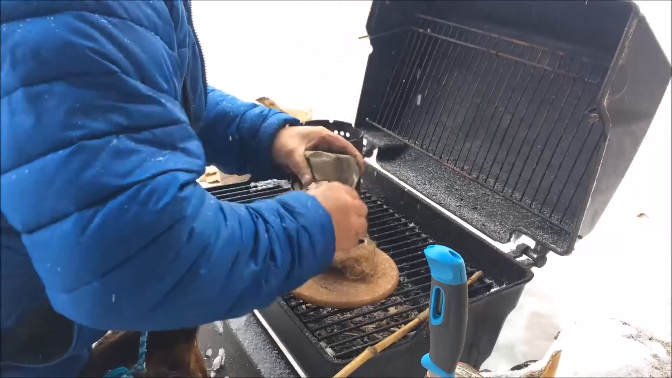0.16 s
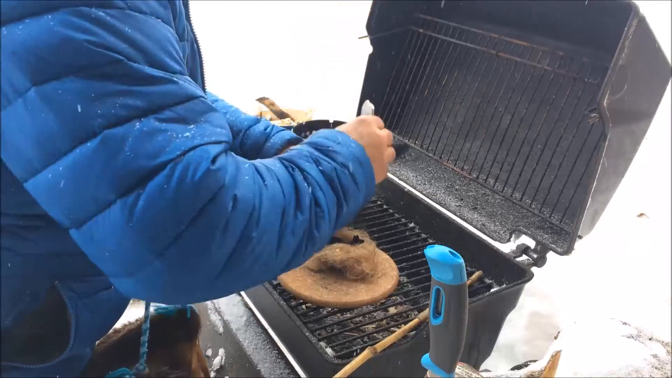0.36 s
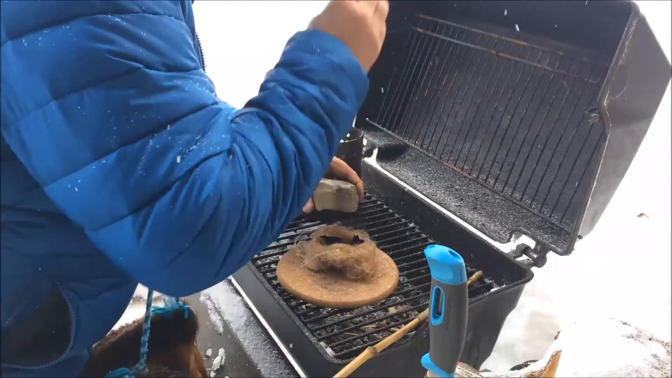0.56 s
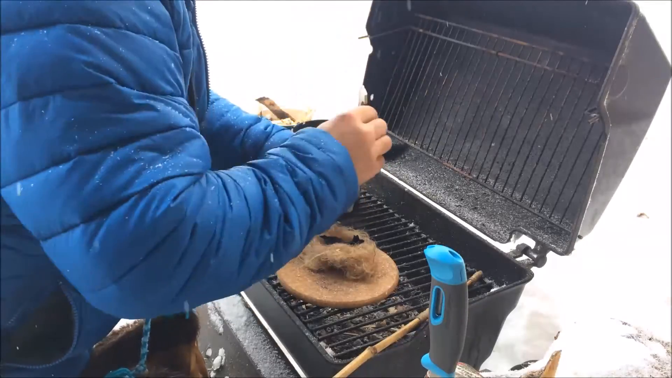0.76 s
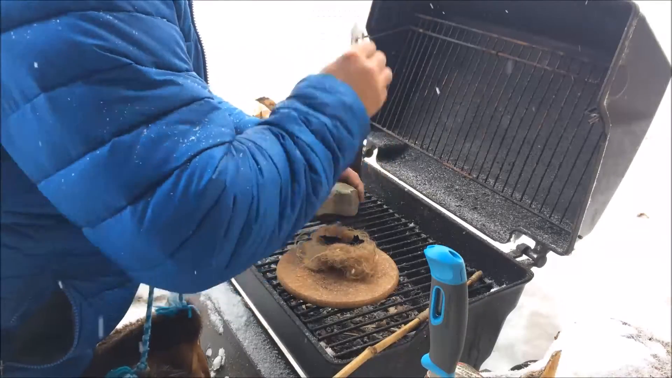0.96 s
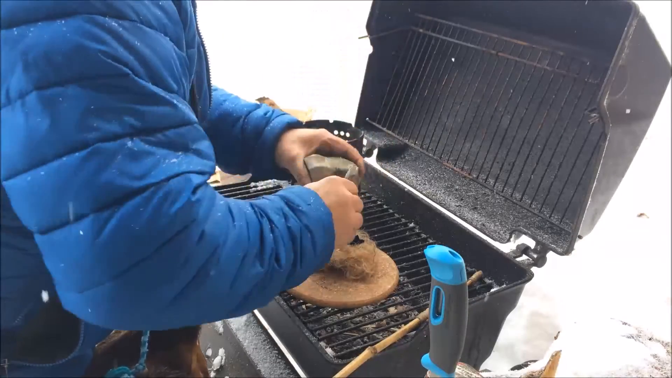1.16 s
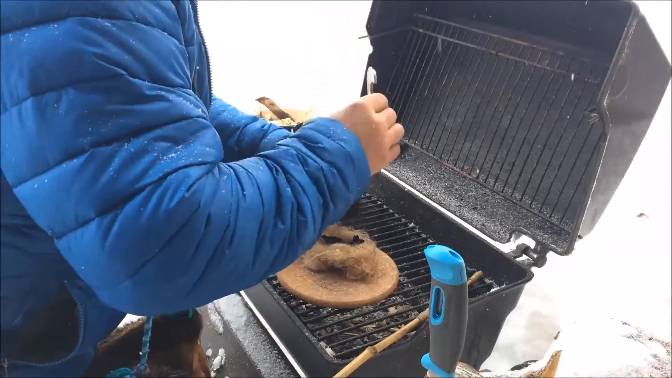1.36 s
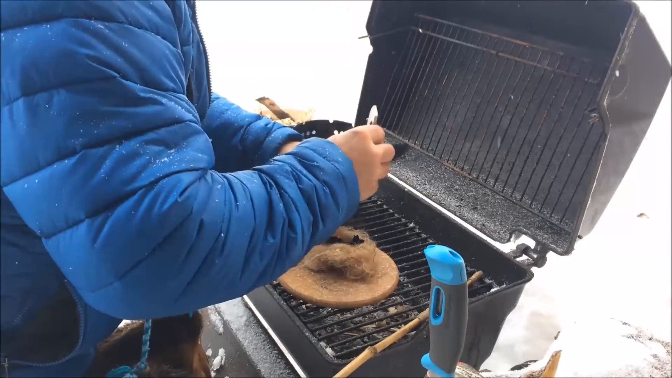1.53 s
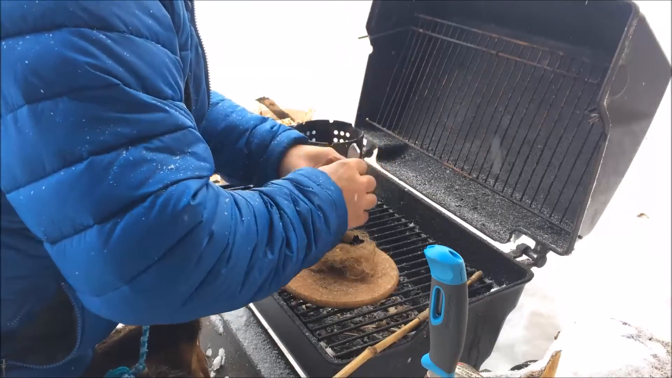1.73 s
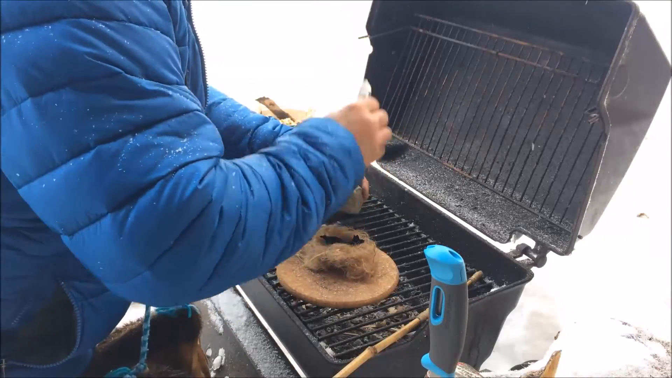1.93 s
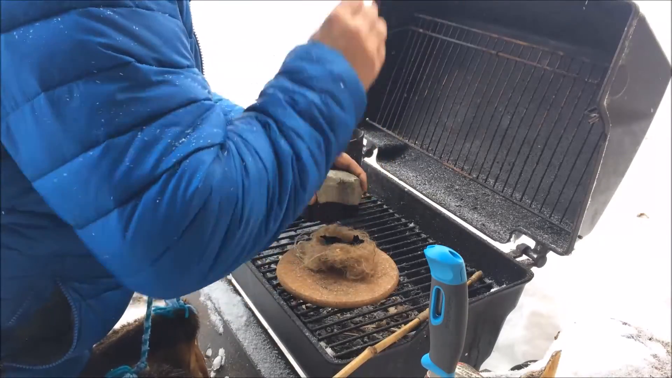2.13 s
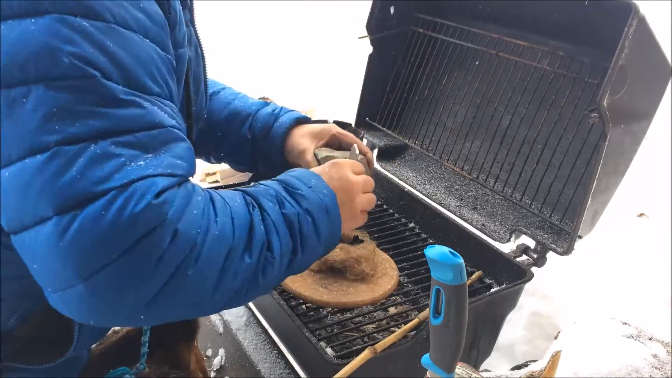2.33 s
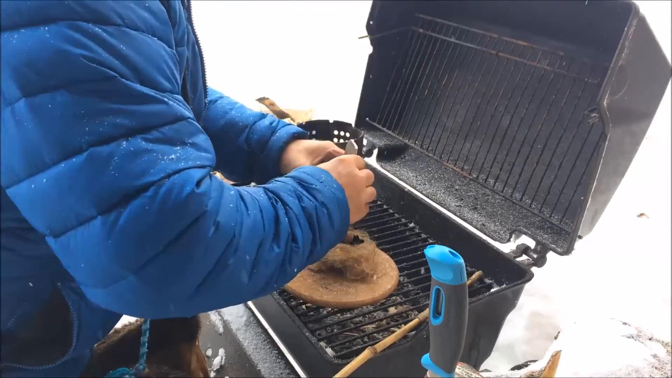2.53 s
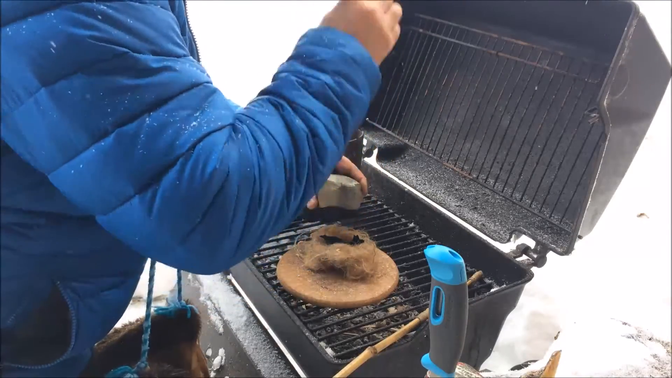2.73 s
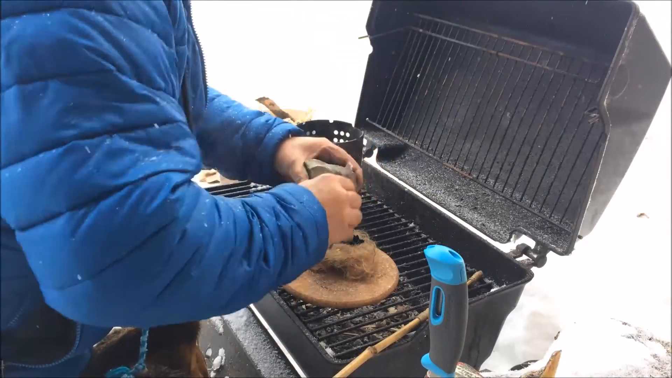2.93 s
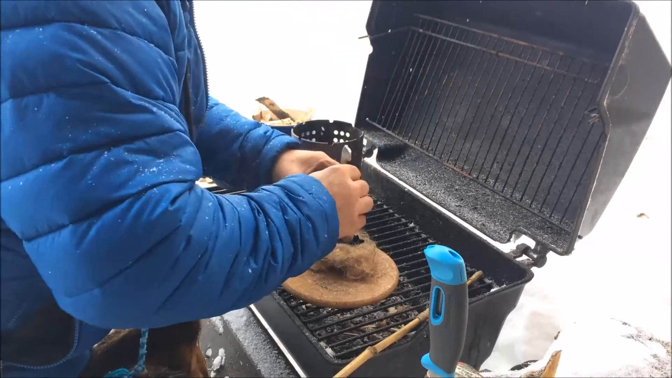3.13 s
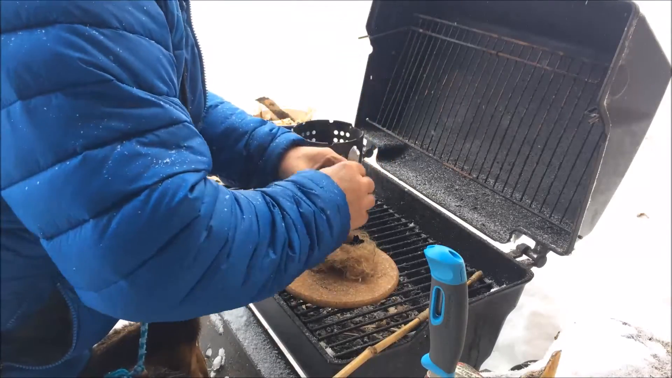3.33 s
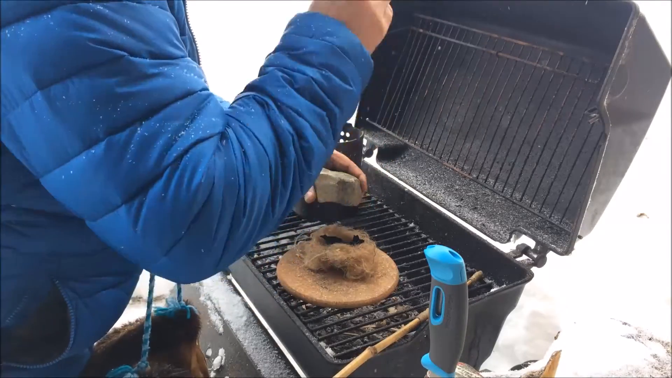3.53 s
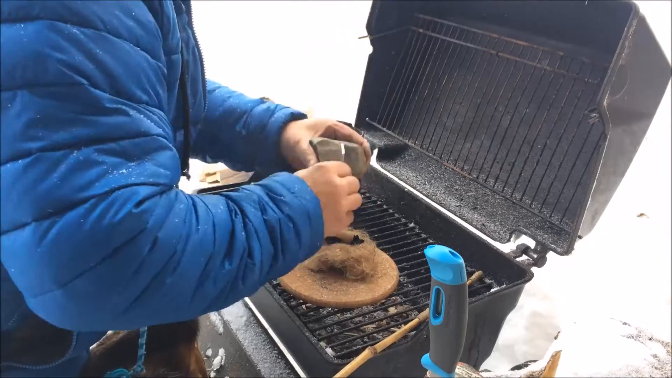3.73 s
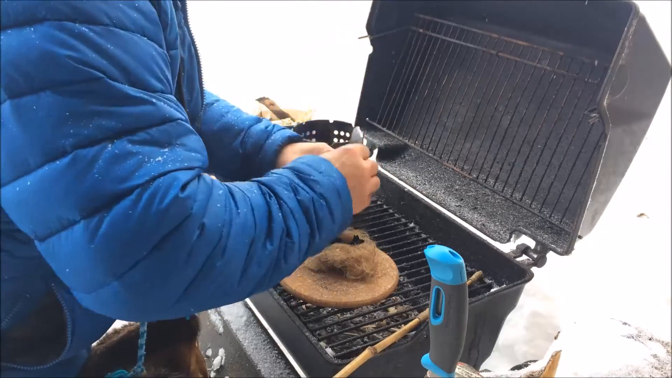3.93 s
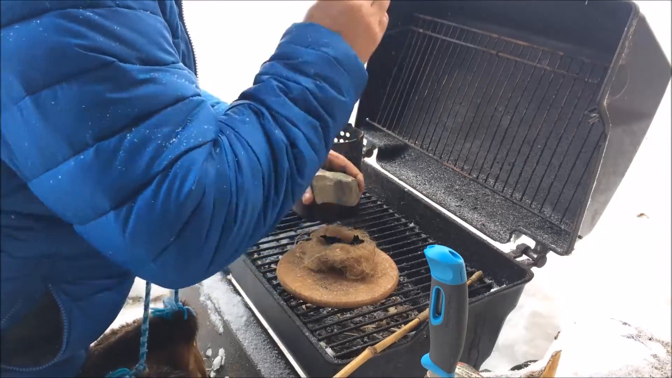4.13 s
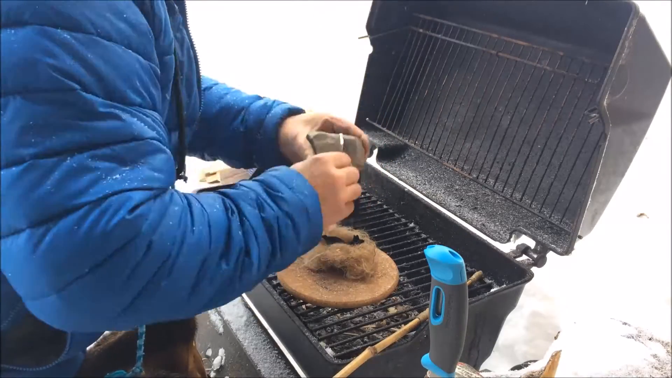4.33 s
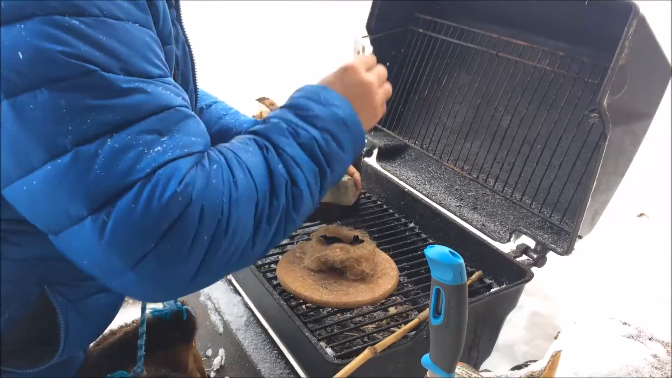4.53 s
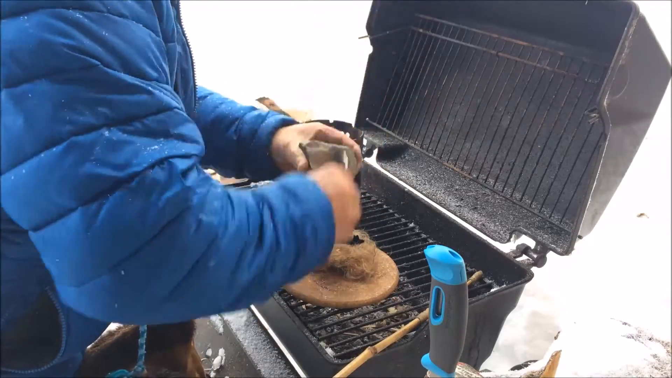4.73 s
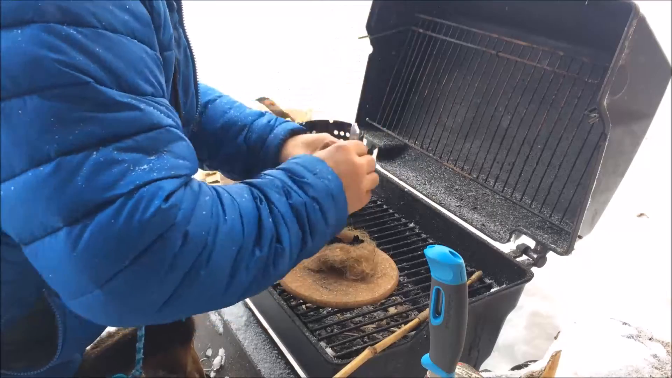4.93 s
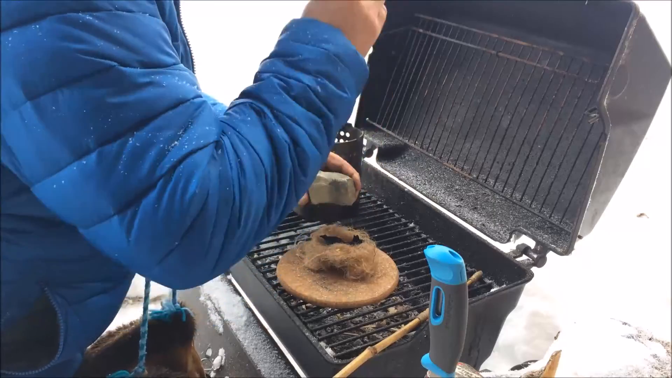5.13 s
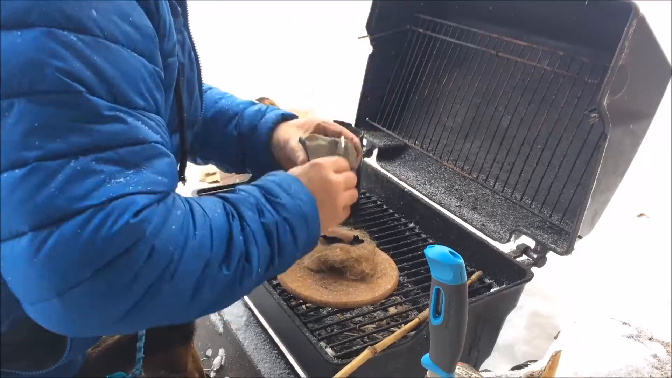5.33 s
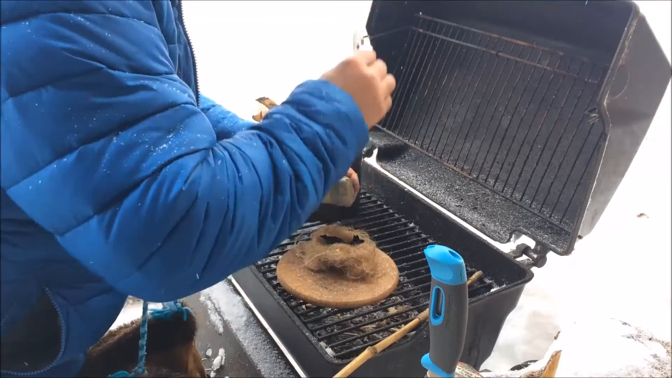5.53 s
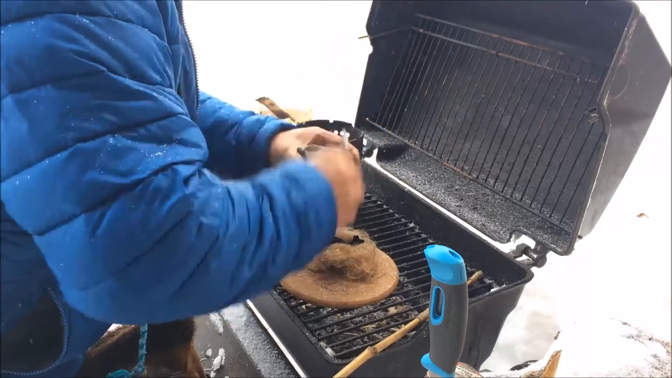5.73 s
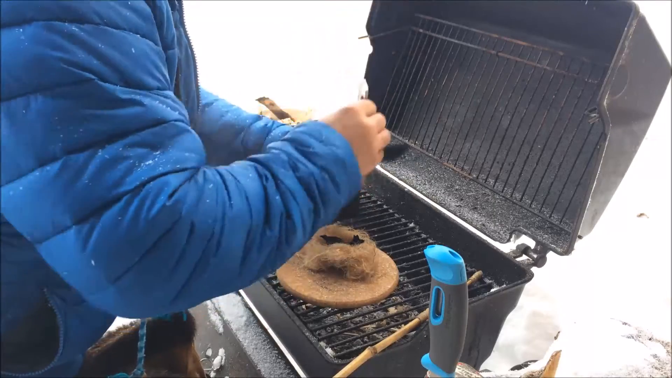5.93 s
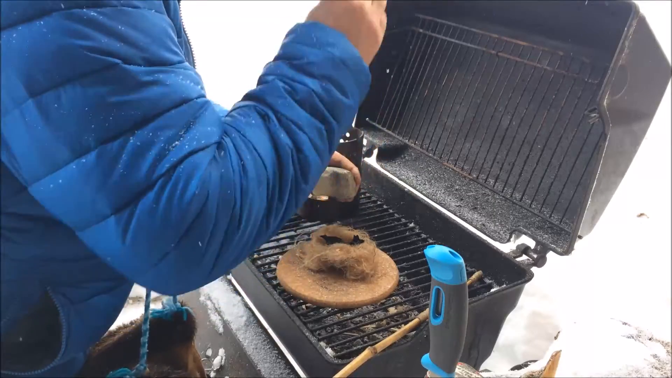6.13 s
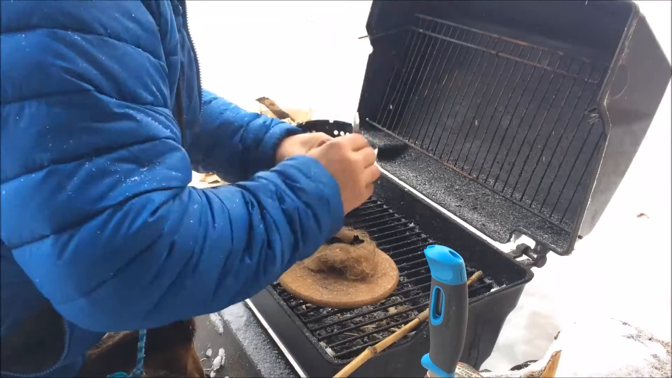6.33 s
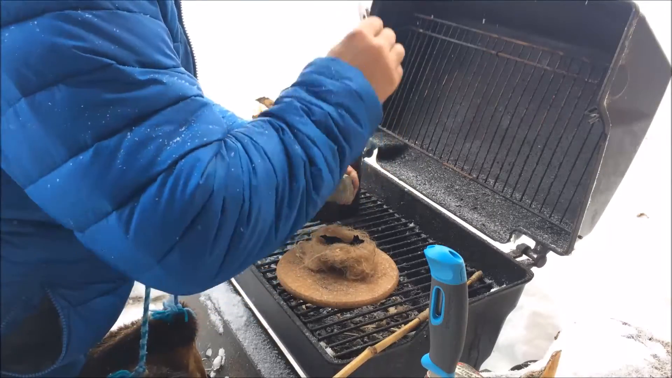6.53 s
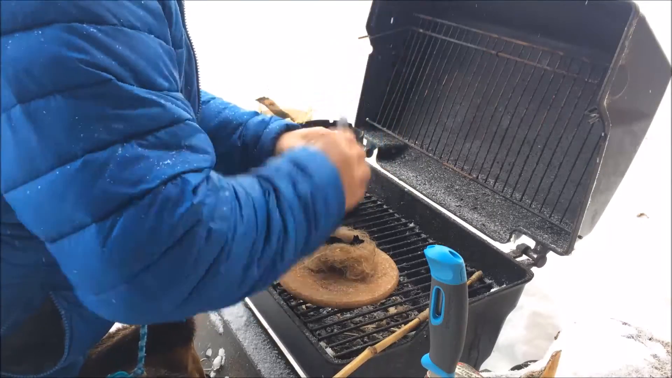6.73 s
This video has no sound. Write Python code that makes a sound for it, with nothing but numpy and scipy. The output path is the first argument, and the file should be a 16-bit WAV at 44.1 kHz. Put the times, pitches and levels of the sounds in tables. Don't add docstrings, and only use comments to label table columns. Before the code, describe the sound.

Repeated hard, bright strikes of steel on stone ring briefly above a metal grill, with padded cloth rustling between them and a low engine murmur far behind.

```python
import sys
import numpy as np
from scipy import signal
from scipy.fft import rfft, irfft
from scipy.io import wavfile
from scipy.ndimage import uniform_filter1d, map_coordinates

SR = 44100
rng = np.random.default_rng(int(sys.argv[2]) if len(sys.argv) > 2 else 0)


def ratio_of_db(decibels):
    return 10 ** (np.asarray(decibels, float) / 20)


def bounce(signal):
    frames = np.transpose(np.atleast_2d(signal))
    limited = np.clip(frames, -1, 1)
    pcm = np.round(limited * 32767).astype(np.int16)
    wavfile.write(sys.argv[1], SR, pcm)


N = 302967

# (time [s], stone knock [dB], bar low mode [dB], bar middle mode [dB], bar high mode [dB])
BLOWS = [(0.2376, -21, -7, -19.5, -9), (0.7483, -12, -10.5, -20, -12), (1.2545, -11, -13, -20.5, -20),
         (1.274, -30.5, -36, -34, -17.5), (1.2895, -27, -22.5, -44, -29.5),
         (2.3015, -10, -11.5, -14.5, -10), (3.004, -13.5, -12.5, -15, -8), (3.747, -15.5, -9, -14, -24.5),
         (4.348, -11, -8, -21.5, -15.5), (4.8528, -10.5, -6.5, -18.5, -19),
         (4.8716, -38, -24.5, -36, -28.5), (5.358, -14.5, -10.5, -31.5, -6.5),
         (5.858, -12.5, -7.5, -19.5, -18), (6.322, -12.5, -12.5, -17, -10.5),
         (6.8613, -16, -8.5, -21, -10.5)]
# (frequency [Hz], width [Hz], level [dB])
STONE = [(832, 59, -9.5), (1312, 600, -2.5), (1406, 36, -6), (1420, 270, -3.5), (1753, 130, -0.5),
         (1994, 210, -5.5), (2040, 45, -3.5), (2260, 250, 0.5), (2471, 50, -2.5), (1970, 2100, -5)]
# (frequency [Hz], width [Hz], level [dB])
BAR_MIDDLE = [(7190, 140, 0), (7050, 60, -4)]
BAR_HIGH = [(10680, 150, 0), (11350, 130, -4), (11000, 1500, -14)]
# (frequency [Hz], width [Hz], level [dB])
GRIT = [(3060, 9100, -4), (5580, 9500, 0.5), (9070, 3100, -8.5), (12010, 530, -12.5), (14200, 250, -7)]
# (frequency [Hz], width [Hz], level [dB])
CRACK = [(1700, 1200, 0), (3300, 2500, -6), (8000, 5000, -22)]
# (frequency [Hz], width [Hz], level [dB])
GRILL_RODS = [(4270, 12, 0), (4385, 15, 0), (4190, 18, -6), (4560, 16, -5)]
# (frequency [Hz], width [Hz], level [dB])
HAND_THUD = [(260, 110, 1.5), (324, 8.4, -1.5), (570, 110, -2)]
# (frequency [Hz], t60 [s])
HOOD_DECAY = [(400, 0.19), (1500, 0.14), (4500, 0.12), (9000, 0.14), (12500, 0.13), (15000, 0.16)]
# (time [s], stone knock [dB], bar low mode [dB], bar middle mode [dB], bar edge mode [dB])
TOUCHES = [
    (1.8376, -17.5, -33, -34, -24.5),
    (1.9268, -31.5, -35, -34, -41),
    (2.6655, -28.5, -30, -17, -27),
    (3.3823, -8.5, -7.5, -21, -36),
]
# (frequency [Hz], width [Hz], level [dB])
TOUCHED_PARTS = [
    [(1500, 600, 0), (2000, 700, 0), (2650, 700, -8), (3500, 900, -17)],
    [(4370, 160, 0), (4300, 40, -7)],
    [(7190, 45, 0)],
    [(11400, 60, 0), (10700, 80, -6), (14700, 200, -8)],
]
# (time [s], frequency [Hz], level [dB], t60 [s])
THUMPS = [
    (1.645, 160, -39, 0.084),
    (1.671, 162, -40, 0.09),
    (3.012, 83.3, -41, 0.2),
    (4.699, 300, -44, 0.015),
]
# (time [s], level [dB])
NUDGES = [
    (1.623, -52.5),
    (1.645, -59),
    (1.665, -58),
    (1.685, -65),
]
# (frequency [Hz], level [dB], t60 [s])
RATTLE = [(2330, -2, 0.045), (2840, -3.5, 0.061), (4750, 5, 0.029), (5740, 0, .06), (5840, -1, 0.048),
          (6200, -2, 0.087), (6900, -7, 0.095), (7320, -8, 0.11), (10500, -9, 0.17)]
# (time of full speed [s], cloth level [dB], held [s])
ARM_LIFTS = [(0.04, -66.5, .1), (.57, -66.5, .07), (1.07, -69, .1), (1.71, -75, .05), (2.12, -66, .08),
             (2.78, -66.5, .1), (3.54, -66.5, .1), (4.18, -66.5, .05), (4.66, -68, .06), (5.18, -66, .05),
             (5.69, -65.5, .06), (6.0, -71, .06), (6.18, -67, .06), (6.6, -70, .12)]
# (frequency [Hz], density [dB per Hz])
CLOTH_HISS = [(2000, -43), (3500, -6.5), (5000, -3.5), (7000, 1.5), (10000, -2), (15600, -2.5)]
# (frequency [Hz], density [dB per Hz])
SWISH = [(700, -32.5), (1300, -5), (2000, -3.5), (3000, -6.5), (4500, -7.5), (8000, -26.5), (15600, -44.5)]
# (time [s], pitch [Hz], level [dB])
ENGINE = [(0, 182, -62.5), (.8, 190.9, -61.5), (2.4, 186.8, -59), (3.4, 178, -63), (4.5, 172.1, -63),
          (5.4, 165, -58), (6.87, 163.4, -63.5)]
# (time [s], pitch [Hz], level [dB])
WHINE = [(0, 581, -68.5), (.7, 583, -71.5), (1.4, 583, -71), (1.6, 582.5, -91.5), (6.87, 572, -77)]
# (time [s], pitch [Hz], level [dB])
LORRY = [(0, 77.2, -91), (2.4, 76.7, -78), (2.6, 76.3, -65), (3.3, 76.6, -67.5), (3.5, 77, -86),
         (6.87, 77, -90)]
# (frequency [Hz], density [dB per Hz])
TRAFFIC = [(15, -64), (25, -29), (54, -7.5), (108, -3), (178, -8.5), (200, -3), (221, -17.5), (344, -11),
           (378, -16), (578, -11), (624, -13.5), (1110, -14), (2500, -38.5), (3250, -70), (5500, -120)]
# (time [s], level [dB])
TRAFFIC_LEVEL = [(0, -62), (1.9, -61.5), (3.6, -61.5), (4.6, -62), (5.8, -61.5), (6.87, -60.5)]
# (time [s], above frequency [Hz])
THINNED = [(0.175, 1500), (0.347, 1600), (0.687, 1500), (1.115, 3300), (1.16, 1800), (1.669, 3000),
           (2.079, 3300), (2.095, 3300), (2.586, 2800), (3.079, 1500), (3.312, 2000), (3.867, 2500),
           (4.038, 2500), (4.08, 2200), (4.145, 2200), (4.293, 2800), (4.444, 5000), (4.804, 3200),
           (4.893, 6000), (5.765, 1500), (6.192, 3300), (6.385, 5000), (6.832, 2000)]

SPAN = 16384
SKID_T60_S, SKID_DB, SKID_HOLD_S = 0.03, -2, 0.0044
GRIP_HZ, GRIP_SHIFT_HZ = 4440, 85
RING_ABOVE_HZ = 620
CRACK_DB, SING_DB = 14.5, -12.5
GRIT_DB, THUD_DB = 3.5, -19
TOUCH_GRIT_DB = -8
JOLT_HZ, JOLT_DB, JOLT_T60_S = 62, -39, .2
SWING_RISE_S, SWING_FALL_S, FALL_SHAPE = .06, .08, 1.5
DOWNSTROKE_DB, DOWN_RISE_S, FOLLOW_S = -54.5, 0.037, 0.096
CLOTH_REST_DB, SWISH_DB, SWISH_GROWS = -73.5, 0.23, 1.2


def unit(x):
    return x / np.sqrt(np.mean(np.abs(x) ** 2) + 1e-20)


def along(points, hz):
    f, v = np.transpose(points)
    return np.interp(np.log(hz + 1), np.log(f + 1), v)


def curves(rows):
    s, *columns = np.transpose(rows)
    return [np.interp(np.arange(N) / SR, s, column) for column in columns]


def wobble(rate):
    knots = rng.standard_normal(int(N * rate / SR) + 4)
    return map_coordinates(knots, [np.arange(N) * rate / SR])


def rush(spectrum, patchy_db):
    hz, _, z = signal.stft(rng.standard_normal(N), SR, nperseg=1024)
    field = uniform_filter1d(rng.standard_normal(z.shape), size=12, axis=0)
    field = uniform_filter1d(field, size=6, axis=1)
    z = z * ratio_of_db(along(spectrum, hz)[:, None] + patchy_db * unit(field))
    return unit(signal.istft(z, SR, nperseg=1024)[1][:N])


def modes(table, f, scatter_db=0):
    gains = ratio_of_db(scatter_db * rng.standard_normal(len(table)))
    response = 0
    for k, (center, width, db) in enumerate(table):
        peak = 1j * f * width / (center * center - f * f + 1j * f * width)
        response = response + (-1) ** k * gains[k] * ratio_of_db(db) * peak
    return unit(response)


def skidding(t60, spike_db, hold=0):
    t = np.maximum(np.arange(SPAN // 4) / SR - hold, 0)
    contacts = rng.standard_normal(len(t))
    spikes_db = spike_db * rng.exponential(1, len(t))
    contacts = contacts * ratio_of_db(spikes_db - 60 * t / max(t60, .004))
    return contacts / np.linalg.norm(contacts)


def hood(size):
    hz, t, z = signal.stft(rng.standard_normal(size // 2), SR, nperseg=128)
    decay = ratio_of_db(-60 * t / along(HOOD_DECAY, hz)[:, None])
    tail = signal.istft(z * decay, SR, nperseg=128)[1]
    tail[:90] = 0
    return rfft(tail / np.linalg.norm(tail), size)


def add_contact(out, s, spectrum, echo_db):
    heard = 3 * SPAN // 4
    answered = spectrum * (1 + ratio_of_db(echo_db) * hood(SPAN))
    out[round(s * SR):][:heard] += irfft(answered, SPAN)[:heard]


def striker(echo_db=-5, gain_db=17):
    out, f = np.zeros(N + SPAN), np.fft.rfftfreq(SPAN, 1 / SR)
    low_cut = (1j * f / (RING_ABOVE_HZ + 1j * f)) ** 2
    parts = (STONE, BAR_MIDDLE, BAR_HIGH, GRIT, GRILL_RODS, CRACK, HAND_THUD)
    for s, stone_db, low_db, middle_db, high_db in BLOWS:
        force = ratio_of_db(SKID_DB) * skidding(SKID_T60_S, spike_db=2.5, hold=SKID_HOLD_S)
        force[:3] -= [.12, .24, .12]
        rung = [modes(table, f, scatter_db=1.0) for table in parts]
        stone, middle, high, grit, rods, crack, thud = rung
        shift = GRIP_SHIFT_HZ * rng.uniform(-1.6, 0.98)
        low = modes([(GRIP_HZ + shift, 150, 0), (GRIP_HZ - shift, 150, -4), (4400, 900, -7)], f)

        body = ratio_of_db(stone_db + 4.0) * stone + ratio_of_db(low_db + 5.0) * low
        body = body + ratio_of_db(middle_db + 4.0) * middle + ratio_of_db(high_db + 1.93) * high
        body = (body + ratio_of_db(stone_db + GRIT_DB) * grit) * low_cut
        body = body + ratio_of_db(stone_db + THUD_DB) * thud
        skid = rfft(force, SPAN) * body * ratio_of_db(gain_db)

        crack_db = max(stone_db, low_db, high_db) + CRACK_DB
        first = ratio_of_db(crack_db) * crack * low_cut
        sing = ratio_of_db(low_db + gain_db + SING_DB) * rods
        add_contact(out, s + 0.00095, skid - first + sing, echo_db)
    return out[:N]


def touches(echo_db=-8):
    out, f = np.zeros(N + SPAN), np.fft.rfftfreq(SPAN, 1 / SR)
    for s, *levels_db in TOUCHES:
        force = ratio_of_db(-5) * skidding(.03, spike_db=4)
        force[:3] -= [.25, .5, .25]
        grit_db = levels_db[1] + TOUCH_GRIT_DB
        voices = zip(levels_db + [grit_db], TOUCHED_PARTS + [GRIT])
        body = sum(ratio_of_db(db) * modes(table, f) for db, table in voices)
        add_contact(out, s, rfft(force, SPAN) * body, echo_db)
    return out[:N]


def bumps():
    out, t = np.zeros(N + SR), np.arange(SR // 4) / SR
    jolts = [(s, JOLT_HZ, stone_db + JOLT_DB, JOLT_T60_S) for s, stone_db, *_ in BLOWS]
    for s, hz, db, t60 in THUMPS + jolts:
        push = ratio_of_db(db - 60 * t / t60) * np.sin(2 * np.pi * hz * t)
        out[round(s * SR):][:len(t)] += push * (1 - np.exp(-t / 0.0012))
    for s, db in NUDGES:
        ring = np.zeros(len(t))
        for hz, level, t60 in RATTLE:
            uneven_db = level + rng.normal(0, 3.3)
            ring += ratio_of_db(uneven_db - 60 * t / t60) * np.sin(2 * np.pi * hz * t)
        out[round(s * SR):][:len(t)] += ratio_of_db(db - 5) * ring * (1 - np.exp(-t / 0.0014))
    return out[:N]


def swings():
    t, power = np.arange(0, N / SR, .002), ratio_of_db(CLOTH_REST_DB) ** 2
    lifts = [(s, db, held, SWING_RISE_S, SWING_FALL_S) for s, db, held in ARM_LIFTS]
    downs = [(s, max(levels_db) + DOWNSTROKE_DB, 0, DOWN_RISE_S, FOLLOW_S) for s, *levels_db in BLOWS]
    for s, db, held, rise_s, fall_s in lifts + downs:
        rise = np.minimum(t - s, 0) / rise_s
        fall = np.maximum(t - s - held, 0) / fall_s
        power = power + ratio_of_db(db) ** 2 * np.exp(-rise ** 2 - fall ** FALL_SHAPE)
    return np.interp(np.arange(N) / SR, t, 10 * np.log10(power))


def sleeve():
    hiss_db = swings()
    swish_db = CLOTH_REST_DB + SWISH_DB + SWISH_GROWS * (hiss_db - CLOTH_REST_DB)
    rub = wobble(38)
    hiss = ratio_of_db(hiss_db + 1.93 + 0.74 * rub) * rush(CLOTH_HISS, patchy_db=1.0)
    swish = ratio_of_db(swish_db + .4 + .8 * rub) * rush(SWISH, patchy_db=1.3)
    return hiss + swish


def hum():
    out = np.zeros(N)
    for rows, drift, sway_db in ((ENGINE, .02, 7), (WHINE, .002, 1.5), (LORRY, .02, 3)):
        hz, db = curves(rows)
        phase = 2 * np.pi * np.cumsum(hz * (1 + drift * wobble(10))) / SR
        sway = sway_db * np.minimum(wobble(30), .8)
        out += np.sqrt(2) * ratio_of_db(db + sway) * np.sin(phase)
    return out


def traffic():
    level_db, = curves(TRAFFIC_LEVEL)
    return ratio_of_db(level_db + 4.0 + 0.14 * wobble(3)) * rush(TRAFFIC, patchy_db=1.46)


def scene():
    return (striker() + touches() + hum() + bumps() + sleeve() + traffic())[None]


def thin_out(x, share=.14, moment_s=.018):
    hz, t, z = signal.stft(x, SR, nperseg=512, noverlap=384)
    for s, above_hz in THINNED:
        moment = np.abs(t - s) < moment_s / 2
        strength = np.abs(z[:, moment]).sum(1) * (hz + 1) ** -.3
        strength /= np.sqrt(uniform_filter1d(strength, size=25))
        high = hz > above_hz
        threshold = np.quantile(strength[high], 1 - np.clip(share, 0, 1))
        weak = high & (strength < threshold)
        z[np.ix_(weak, moment)] *= ratio_of_db(-17)
    return signal.istft(z, SR, nperseg=512, noverlap=384)[1][:N]


def roll_off(x):
    return signal.sosfilt(signal.butter(12, 16470, fs=SR, output="sos"), x)


def record(dry):
    held = dry[0] / (1 + np.abs(dry[0] / 1.2) ** 6) ** (1 / 6)
    hz = np.fft.rfftfreq(N, 1 / SR)
    top_hz = 15350
    edge = ratio_of_db(along([(top_hz - 200, 0), (top_hz + 100, -26), (16500, -38), (17000, -90)], hz))
    mix = thin_out(irfft(rfft(held) * edge, N))
    return roll_off(np.clip(mix, -1, 1)[None])


dry = scene()
out = record(dry)
bounce(out)
```